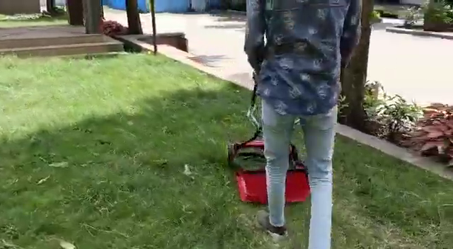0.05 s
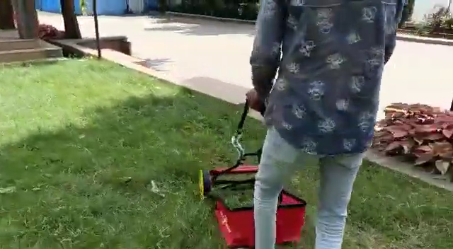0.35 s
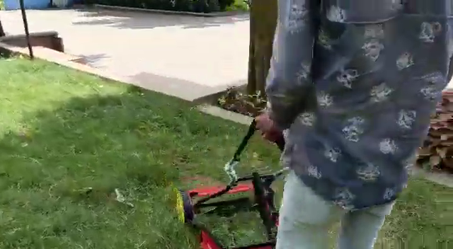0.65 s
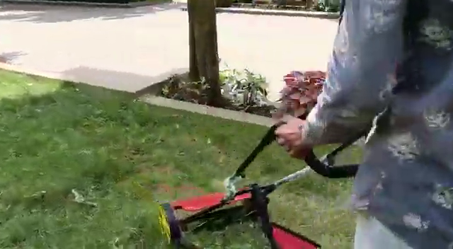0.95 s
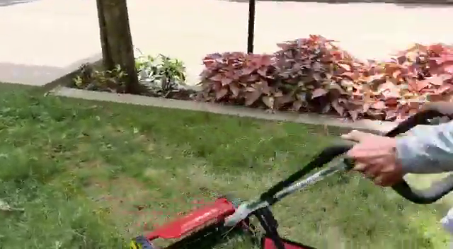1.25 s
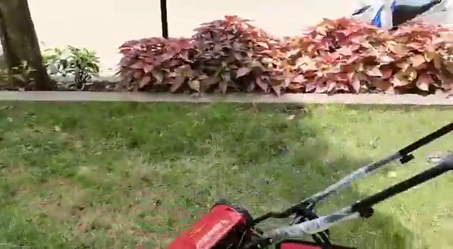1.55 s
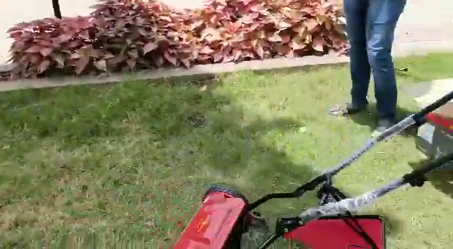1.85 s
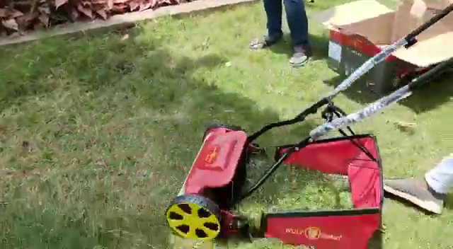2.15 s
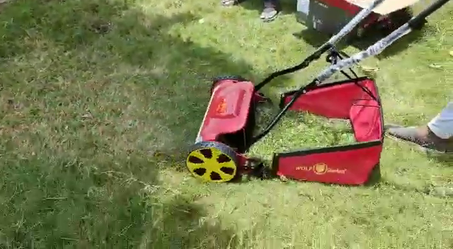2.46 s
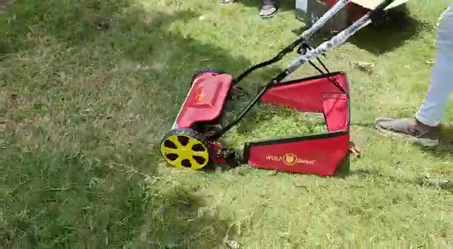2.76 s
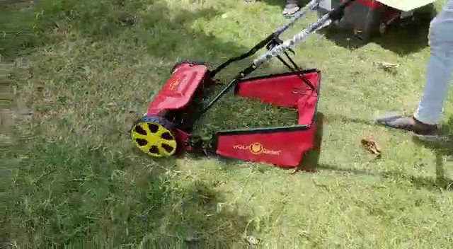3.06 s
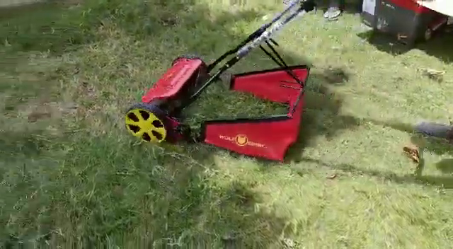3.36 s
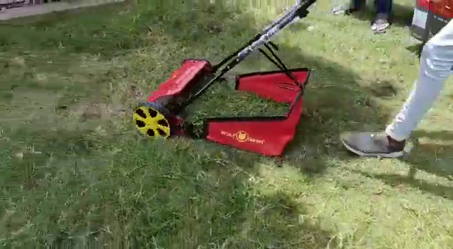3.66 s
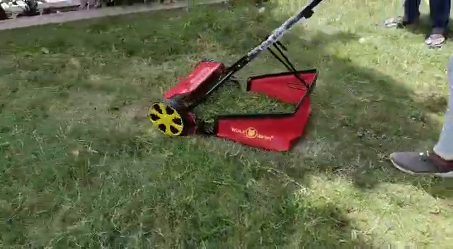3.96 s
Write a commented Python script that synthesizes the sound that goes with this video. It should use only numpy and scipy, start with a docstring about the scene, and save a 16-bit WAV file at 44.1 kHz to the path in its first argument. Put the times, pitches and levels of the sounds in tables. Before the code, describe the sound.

Push reel mower blades scrape along slowly, stop briefly, then speed into a louder rattling whir.

```python
"""Blades swish and scrape one by one past the bed knife as a push reel mower rolls slowly over a lawn;
loose gears rattle, freewheel pawls click and steel squeaks on steel. The mower knocks as it is swung
round, runs down and is set on the grass. Shoved forward hard, its blade passes merge into a whir and
the steel frame rings. Light wind buffets the microphone over quiet outdoor air."""
import sys
import numpy as np
from scipy import signal
from scipy.fft import rfft, irfft, next_fast_len
from scipy.io import wavfile

SR = 44100
rng = np.random.default_rng(int(sys.argv[2]) if len(sys.argv) > 2 else 0)


def generate_wav(sig):
    """Save sig (samples, or channels by samples) to the path in sys.argv[1] as 16-bit PCM at SR."""
    pcm = np.round(np.clip(np.atleast_2d(sig).T, -1, 1) * 32767).astype(np.int16)
    wavfile.write(sys.argv[1], SR, pcm)


N = 176400
TIME = np.arange(N) / SR
ROLL_END_S, PUSH_START_S = 2.55, 2.725


def from_db(db):
    """Decibels to gain."""
    return 10 ** (np.asarray(db) / 20)


def rms_one(x):
    """Scale to unit rms."""
    return x / np.sqrt(np.mean(x ** 2) + 1e-20)


def curve(rows):
    """Linear interpolation of (t/s, value) rows."""
    return np.interp(TIME, *np.transpose(rows))


def swell(t_s, sigma_s):
    """Gaussian rise and fall around t_s."""
    return np.exp(-.5 * np.minimum(((TIME - t_s) / sigma_s) ** 2, 100))


def colour(x, spectrum, share=1):
    """Minimum-phase filter; share scales the dB curve. At share 1, white noise keeps its power."""
    size = next_fast_len(N + SR // 2, True) // 2 * 2
    hz, db = np.transpose(spectrum)
    bins_hz = np.fft.rfftfreq(size, 1 / SR)
    gain = from_db(share * np.interp(np.log(bins_hz + 1), np.log(hz), db))
    if share == 1:
        gain = rms_one(gain)
    cepstrum = irfft(np.log(gain))
    cepstrum[1:size // 2] *= 2
    cepstrum[size // 2 + 1:] = 0
    return irfft(rfft(x, size) * np.exp(rfft(cepstrum)))[..., :N]


def spread(x, lag_ms, scatter_db, t60_s):
    """Stereo: direct sound, lagged on the right, plus scatter off hood, catcher and yard."""
    x, t = np.broadcast_to(x, (2, N)), TIME[:SR // 2]
    tails = rng.standard_normal((2, len(t))) * from_db(-60 * t / t60_s) * (t > .001)
    tails /= np.sqrt(np.sum(tails ** 2, axis=1, keepdims=True))
    direct = np.array([x[0], np.roll(x[1], round(lag_ms * SR / 1000))])
    scatter = signal.fftconvolve(x, tails, axes=1)[:, :N]
    wet = from_db(scatter_db)
    return (direct + wet * scatter) / np.sqrt(1 + wet ** 2)


def grit(per_s, spread_db, smooth, alike):
    """Tiny uneven metal contacts over friction noise; smooth = noise share, alike = L/R correlation."""
    sizes = from_db(spread_db * np.minimum(rng.exponential(1, (3, N)), 3.5))
    signs = rng.choice([-1, 1], (3, N))
    contacts = rms_one(sizes * signs * (rng.random((3, N)) < per_s / SR))
    x = np.sqrt(1 - smooth) * contacts + np.sqrt(smooth) * rng.standard_normal((3, N))
    return np.sqrt(alike) * x[0] + np.sqrt(1 - alike) * x[1:]


def blows(rows, column, decay_s):
    """Decaying noise burst at each row's time; level/dB from the given column."""
    out = np.zeros(N)
    for row in rows:
        age = TIME[:N - int(row[0] * SR)]
        out[-len(age):] += from_db(row[column]) * np.exp(-np.minimum(age / decay_s, 20))
    return out * rng.choice([-1, 1], N)


def pings(hits, low_hz, high_hz, decay_s, count):
    """Each (t/s, level/dB) hit lands on another spot of the steel and rings its own partials."""
    out, age = np.zeros(N + SR), TIME[:SR // 5]
    for (t_s, db), (pitch, phase) in zip(hits, rng.random((len(hits), 2, count, 1))):
        hz = low_hz * (high_hz / low_hz) ** pitch
        partials = np.sin(2 * np.pi * (hz * age + phase)).sum(axis=0) * np.sqrt(2 / count)
        out[int(t_s * SR):][:len(age)] += from_db(db) * partials * np.exp(-age / decay_s)
    return out[:N]


AIR_SPECTRUM = [(25, -14), (100, -6.5), (300, 2), (1000, -0.5), (2000, -21), (6000, -14.5), (16000, -19.5)]  # f/Hz, rel. level/dB
def air():
    """Quiet, steady outdoor air."""
    noise = colour(rng.standard_normal(N), AIR_SPECTRUM)
    return from_db(-52.5) * spread(noise, lag_ms=0, scatter_db=-17.5, t60_s=.29)


# gusts: t/s, left level/dB, right level/dB, sigma/s
WIND_BUFFETS = [(0.126, -37.5, -76, 0.036), (0.216, -28, -68, 0.012), (0.395, -36.5, -68, 0.042),
                (0.715, -31.5, -69, 0.034), (1.05, -39, -43, 0.071), (1.676, -40, -39.5, 0.044),
                (2.12, -31, -60, 0.052), (2.608, -37, -53, 0.16), (3.858, -26.5, -67, 0.033),
                (3.975, -25.5, -60, 0.043)]
WIND_SPECTRUM = [(20, -32), (50, -2.5), (90, 4.5), (130, -1.5), (200, -19.5), (600, -42)]  # f/Hz, rel. level/dB
def wind():
    """Wind rumbles on each microphone port, mostly the left."""
    gusts = sum(from_db([[left], [right]]) * swell(t_s, sigma_s)
                for t_s, left, right, sigma_s in WIND_BUFFETS)
    return (from_db(-57) + gusts) * colour(rng.standard_normal((2, N)), WIND_SPECTRUM)


# thumps: t/s, level/dB, sigma/s
TURF_THUMPS = [(1.368, -29, 0.028), (1.701, -35, 0.012), (1.869, -27.5, 0.01), (2.229, -35, 0.0056),
               (2.275, -33.5, 0.03), (2.578, -28.5, 0.021), (2.677, -33, 0.026), (2.832, -43.5, 0.018)]
TURF_SPECTRUM = [(25, -23), (70, 10), (110, 24), (160, 17), (230, 13.5), (600, -52)]  # f/Hz, rel. level/dB
def turf_thumps():
    """Soft low thumps on the turf."""
    envelope = sum(from_db(db) * swell(t_s, sigma_s) for t_s, db, sigma_s in TURF_THUMPS)
    rumble = colour(rng.standard_normal(N), TURF_SPECTRUM)
    return envelope * spread(rumble, lag_ms=0, scatter_db=0, t60_s=.18)


# steel on steel: t/s, sigma/s, f/Hz, level/dB
BLADE_SQUEAKS = [(0.012, 0.065, 3990, -47.5), (0.238, 0.071, 2270, -51), (.37, 0.035, 3740, -45.5),
                 (0.475, 0.018, 4670, -44)]
def squeaks():
    """A blade rubs the knife and sings in a narrow band."""
    out = 0
    for t_s, sigma_s, hz, db in BLADE_SQUEAKS:
        band = signal.lfilter(*signal.iirpeak(hz, Q=1 / .047, fs=SR), rng.standard_normal(N))
        out = out + from_db(db) * swell(t_s, sigma_s) * rms_one(band)
    return spread(out, lag_ms=-.05, scatter_db=-5, t60_s=.08)


# freewheel clicks: t/s, tick rel. level/dB, clack level/dB
PAWL_CLICKS = [(.687, -34, -47), (0.745, -37, -45), (1.085, -29, -42), (1.127, -26, -34),
               (1.228, -28.5, -29.5), (1.308, -29, -33.5), (1.336, -27.5, -38), (1.628, -34, -40),
               (1.664, -41, -29), (1.714, -29, -35), (1.732, -28.5, -31), (1.757, -38, -44),
               (1.772, -24, -51), (1.854, -24, -39), (1.875, -26, -31), (1.918, -28, -32.5),
               (1.944, -29.5, -37), (2.022, -30, -46), (2.074, -30, -36), (2.099, -37, -33),
               (2.121, -32.5, -40), (2.2, -34.5, -37.5), (2.252, -32, -34), (2.311, -33.5, -39.5),
               (2.379, -38, -38), (2.397, -50, -37), (2.443, -43, -34), (2.514, -35.5, -37.5),
               (2.67, -48, -44.5)]
def pawls():
    """Each pawl drops into its tooth: a crisp, tinkling tick and a short ringing clack."""
    tinkle = pings([(t_s, db - 3) for t_s, db, _ in PAWL_CLICKS],
                   low_hz=8530, high_hz=12070, decay_s=.0093, count=10)
    tick = from_db(-2) * colour(blows(PAWL_CLICKS, column=1, decay_s=.0057), SWISH_SPECTRUM)
    clack = pings([(t_s, db) for t_s, _, db in PAWL_CLICKS],
                  low_hz=1106, high_hz=4296, decay_s=.013, count=24)
    return (spread(tick + tinkle, lag_ms=-.04, scatter_db=0, t60_s=.017)
            + spread(clack, lag_ms=.04, scatter_db=-8, t60_s=.07))


# steel resonances: f/Hz, rel. level/dB, t60/s
FRAME_MODES = [(464, 6.5, 0.76), (808, 2, 0.36), (1052, 6, 0.1), (1197, -5, 0.22), (1285, 7, 0.085),
               (1732, 0, 0.17), (1895, -19, .6), (2500, 2, 0.13), (2660, 2, 0.18)]
def frame_ring(force, contact_hz):
    """Frame modes driven by a force; a soft contact reaches only the low ones."""
    drive = signal.lfilter(*signal.butter(2, contact_hz, fs=SR), force + 1e-18)
    out = 0
    for hz, db, t60_s in FRAME_MODES:
        radius, angle = from_db(-60 / (t60_s * SR)), 2 * np.pi * hz / SR
        mode = signal.lfilter([.5, 0, -.5], [1, -2 * radius * np.cos(angle), radius ** 2], drive)
        out = out + from_db(db) * np.sqrt(1 - radius ** 2) * mode
    return out / 2


# handle, wheel and pawl knocks: t/s, then thud, clank, tick rel. level/dB
KNOCK_HITS = [(1.210, -48, -35, -44), (1.232, -44, -25, -39), (1.303, -29.5, -31, -28),
              (1.436, -34, -22, -30.5), (1.450, -33.5, -14, -53), (2.566, -22.5, -35.5, -62),
              (2.720, -32, -23.5, -22), (2.739, -53, -19.5, -28), (2.945, -60, -19, -36),
              (3.121, -48, -12, -24), (3.397, -47, -25, -14), (3.574, -40.5, -16.5, -17),
              (3.642, -40, -24, -21), (3.755, -45, -23, -14)]
THUD_SPECTRUM = [(60, -5), (170, -16.5), (285, 10), (360, 3), (550, -16), (1500, -65)]  # f/Hz, rel. level/dB
CLANK_SPECTRUM = [(200, -41), (350, 4.5), (480, 14.5), (660, 1), (810, 14), (1060, 9), (1400, 1.5),
                  (4000, -11), (7000, -25)]  # f/Hz, rel. level/dB
def knocks():
    """Each knock thuds the chassis, clanks the frame and ticks the blades."""
    thud = blows(KNOCK_HITS, column=1, decay_s=.022)
    clank = blows(KNOCK_HITS, column=2, decay_s=.01)
    tick = blows(KNOCK_HITS, column=3, decay_s=.008)
    ring = from_db(-2.5) * frame_ring(clank, contact_hz=596)
    body = colour(thud, THUD_SPECTRUM) + colour(clank, CLANK_SPECTRUM) + ring
    edge = colour(tick, SHEAR_SPECTRUM) + from_db(-4) * colour(tick, HISS_SPECTRUM)
    return (spread(body, lag_ms=.04, scatter_db=-9, t60_s=.06)
            + spread(edge, lag_ms=.22, scatter_db=0, t60_s=.047))


# reel speed: t/s, blade passes/Hz
PASS_RATE = [(0, 20.85), (.25, 22.2), (.7, 17.91), (.95, 19.96), (1.2, 29.08), (1.55, 22.91), (1.85, 24.83),
             (2.05, 16.96), (2.3, 16.76), (2.55, 12.84), (2.6, 0), (2.72, 0), (2.8, 48), (2.95, 59),
             (3.3, 61.5), (3.55, 56.5), (4, 56)]
def blade_passes(attack, decay, floor, uneven_db):
    """Envelope: each blade bites with its own force and slides off the knife; times in passes."""
    passes = np.cumsum(curve(PASS_RATE)) / SR + .85  # first bite 0.15 pass in
    blade, phase = passes.astype(int), passes % 1
    bite = np.minimum(phase / attack, 1) * np.exp(-np.maximum(phase - attack, 0) / decay)
    strength = from_db(uneven_db * (2 * rng.random(blade[-1] + 1) - .5))
    return rms_one(floor + bite * strength[blade])


GEAR_LEVEL = [(0, -62), (.5, -50.5), (.7, -48), (.95, -49.5), (1.25, -35.5), (1.55, -34.5), (1.63, -45),
              (1.8, -30), (2.0, -40.5), (2.4, -44), (2.52, -67), (2.71, -62), (2.745, -25.5), (2.8, -39),
              (2.95, -31), (3.3, -45)]  # t/s, rel. level/dB
GEAR_SPECTRUM = [(150, -31), (320, -0.5), (390, -32), (490, 8.5), (700, -34), (920, 0.5), (1050, 9.5),
                 (1290, 6.5), (1450, -22), (3000, -21)]  # f/Hz, rel. level/dB
def gears():
    """Loose gears rattle with the reel and ring the frame."""
    rattle = grit(per_s=700, spread_db=3.1, smooth=.36, alike=.93) * from_db(curve(GEAR_LEVEL))
    rattle *= blade_passes(attack=.12, decay=.15, floor=.79, uneven_db=2)
    ring = from_db(-15.5) * frame_ring(rattle, contact_hz=1330)
    return spread(colour(rattle, GEAR_SPECTRUM) + ring, lag_ms=.03, scatter_db=-3, t60_s=.064)


SCRAPE_LEVEL = [(0, -47), (.98, -46.5), (1.13, -33), (1.26, -31), (1.4, -38), (1.53, -33.5), (1.72, -41),
                (1.81, -33), (1.95, -43), (2.4, -48.5), (2.55, -48.5)]  # t/s, rel. level/dB
SCRAPE_SPECTRUM = [(250, -8.5), (600, -12), (900, 2.5), (1700, 6), (2500, 8), (3300, 7.5), (4200, -2),
                   (5400, -8), (9000, -32)]  # f/Hz, rel. level/dB
def blade_scrape(gate):
    """Slow blades scrape the knife while parts clink at random."""
    scrape = grit(per_s=1500, spread_db=3.5, smooth=.43, alike=.54) * from_db(curve(SCRAPE_LEVEL))
    scrape *= gate * blade_passes(attack=.049, decay=.42, floor=1, uneven_db=5)
    clink_s = rng.uniform(0, ROLL_END_S, size=150)
    clink_db = np.interp(clink_s, *np.transpose(SCRAPE_LEVEL)) - 3
    clinks = pings(list(zip(clink_s, clink_db)), low_hz=555, high_hz=4540, decay_s=.014, count=4)
    return spread(colour(scrape, SCRAPE_SPECTRUM) + clinks, lag_ms=-.04, scatter_db=-3.5, t60_s=.14)


SWISH_LEVEL = [(0, -40.5), (.09, -44.5), (.3, -47), (.55, -42), (.7, -47.5), (1.0, -42.5), (1.25, -32),
               (1.42, -37), (1.85, -33), (1.92, -41.5), (2.35, -44), (2.49, -46.5)]  # t/s, rel. level/dB
SWISH_SPECTRUM = [(3000, -41), (5000, -4), (6500, -2), (7700, -3), (9300, 3.5), (10200, 1.5), (11200, 0),
                  (13000, -7), (16000, -8)]  # f/Hz, rel. level/dB
def blade_swish(gate):
    """Slow blades pass the knife, one bright swish each."""
    swish = grit(per_s=2000, spread_db=4.9, smooth=.4, alike=.063) * from_db(curve(SWISH_LEVEL))
    swish *= gate * blade_passes(attack=.025, decay=.67, floor=.43, uneven_db=5)
    return spread(colour(swish, SWISH_SPECTRUM), lag_ms=-.04, scatter_db=-5.5, t60_s=.017)


# tone swells: t/s, sigma/s, level/dB
FRAME_NOTES = [(3.045, 0.092, -32.5), (3.536, 0.083, -35), (3.764, 0.036, -36.5)]
def frame_song(pitch_hz=906, waver_hz=7, wavers_per_s=60):
    """The hard-driven frame sings briefly on one wavering note."""
    envelope = sum(from_db(db) * swell(t_s, sigma_s) for t_s, sigma_s, db in FRAME_NOTES)
    waver = np.interp(TIME * wavers_per_s, np.arange(2000), rng.standard_normal(2000))
    cycles = np.cumsum(pitch_hz + waver_hz * waver) / SR
    return envelope * np.sqrt(2) * np.sin(2 * np.pi * cycles)


FRAME_LEVEL = [(2.78, -42), (2.96, -27), (3.55, -22.5), (4.0, -23.5)]  # t/s, rel. level/dB
FRAME_SPECTRUM = [(50, -80), (200, -12), (410, -15), (480, 8.5), (620, 1), (750, -2.5), (900, -7),
                  (1050, -4), (1220, 4.5), (1420, -12.5), (2000, -21.5), (4000, -28)]  # f/Hz, rel. level/dB
def frame_rattle(drive):
    """Fast blade passes shake the frame, which rattles and rings."""
    rattle = grit(per_s=1200, spread_db=5.1, smooth=.24, alike=.97)
    rattle *= from_db(curve(FRAME_LEVEL) - 4.5) * drive ** .84
    ring = from_db(-6.5) * frame_ring(rattle, contact_hz=6000)
    return spread(colour(rattle, FRAME_SPECTRUM) + ring, lag_ms=.053, scatter_db=-7.5, t60_s=.058)


# hard push: t/s, rel. level/dB
HISS_LEVEL = [(2.765, -70), (2.795, -41.5), (2.92, -32.5), (3.1, -28.5), (4.0, -30.5)]
SHEAR_LEVEL = [(2.76, -36.5), (2.82, -30.5), (2.95, -26.5), (3.25, -23.5), (4.0, -23)]
# fast blades: f/Hz, rel. level/dB
HISS_SPECTRUM = [(3500, -21), (5200, 0.5), (5700, -2.5), (6450, 1), (7700, -8), (9400, -4), (10400, -6.5),
                 (11300, 0.5), (13000, -9.5), (16000, -18)]
SHEAR_SPECTRUM = [(700, -54), (1500, -9.5), (2100, -12), (2330, -1), (2600, 0), (2900, -10), (3450, -10),
                  (3900, -9), (4300, -6), (4900, -9.5), (5600, -20), (9000, -28)]
def reel_whir(drive):
    """Fast blades hiss and shear along the knife; their passes merge into a whir."""
    hiss = grit(per_s=4000, spread_db=3.2, smooth=.28, alike=.35)
    hiss *= from_db(curve(HISS_LEVEL) + 2) * drive ** .77
    shear = grit(per_s=3500, spread_db=5.8, smooth=.33, alike=.45)
    shear *= from_db(curve(SHEAR_LEVEL) + 1) * drive
    return (spread(colour(shear, SHEAR_SPECTRUM), lag_ms=.3, scatter_db=0, t60_s=.06)
            + spread(colour(hiss, HISS_SPECTRUM), lag_ms=.3, scatter_db=-.5, t60_s=.056))


def scene():
    """Slow roll, then hard push, over the yard's background."""
    roll_gate = np.clip((ROLL_END_S - TIME) / .007, 0, 1)
    push_gate = np.clip((TIME - PUSH_START_S) / .012, 0, 1)
    drive = push_gate * blade_passes(attack=.26, decay=.46, floor=.6, uneven_db=3.5)
    background = air() + wind() + turf_thumps()
    parts = squeaks() + pawls() + knocks() + gears()
    roll = blade_scrape(roll_gate) + blade_swish(roll_gate)
    push = frame_song() + frame_rattle(drive) + reel_whir(drive)
    return background + parts + roll + push


# microphone port contrast: f/Hz, rel. left minus right level/dB
PORT_CONTRAST = [(300, -1.5), (700, 1.5), (1100, -2), (1700, 7), (2300, 1.5), (3200, 0), (3700, -8),
                 (4600, -9), (5500, -1), (6800, 6), (8500, -6.5), (10500, -1.5), (11600, -6.5), (13000, -2),
                 (16000, 0)]
def record(dry, cutoff_hz=15900):
    """Each microphone port colours its side; a steep low-pass cuts the top."""
    left = colour(dry[0], PORT_CONTRAST, share=.52)
    right = colour(dry[1], PORT_CONTRAST, share=-.73)
    lowpass = signal.ellip(12, .1, 80, cutoff_hz, fs=SR, output="sos")
    return signal.sosfilt(lowpass, np.array([left, right]))


dry = scene()
out = record(dry)
generate_wav(out)
```